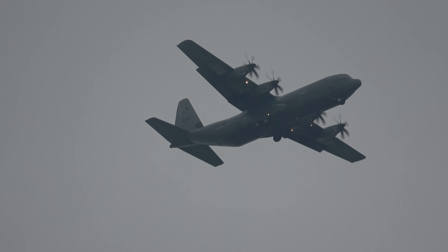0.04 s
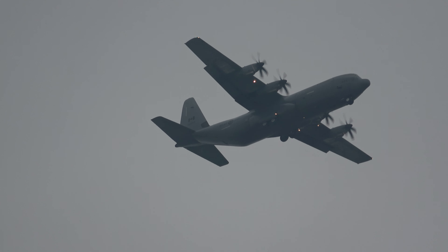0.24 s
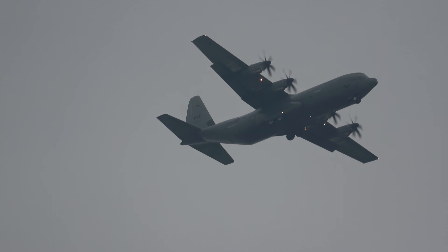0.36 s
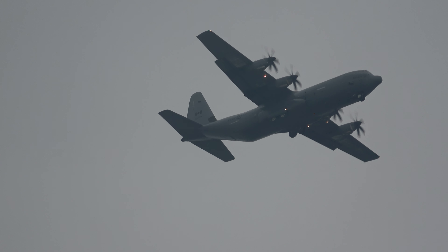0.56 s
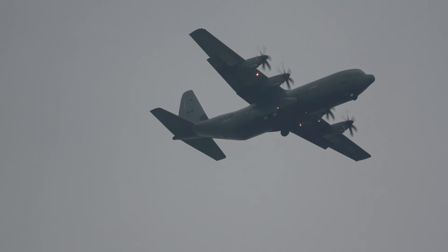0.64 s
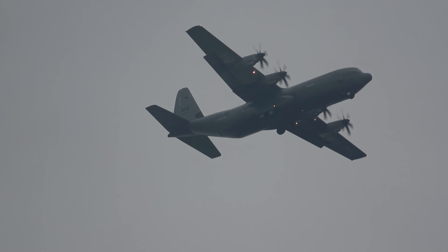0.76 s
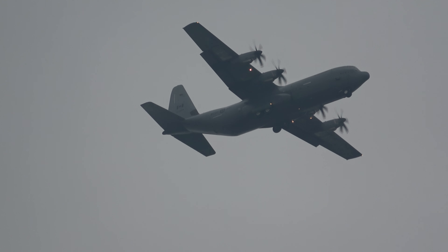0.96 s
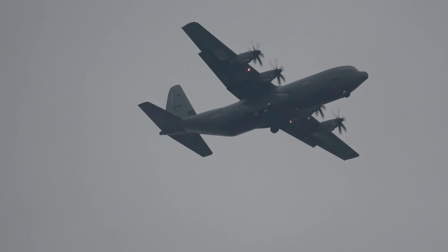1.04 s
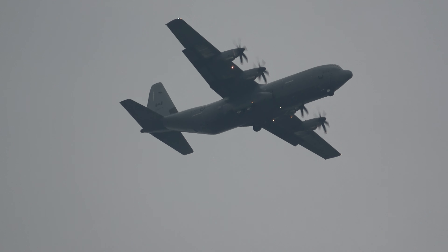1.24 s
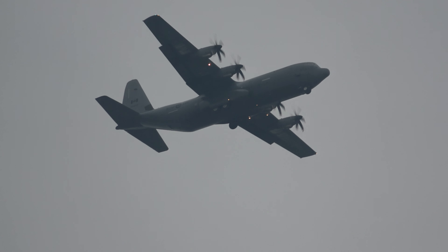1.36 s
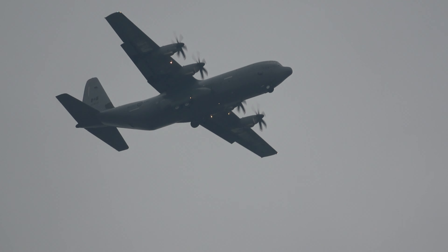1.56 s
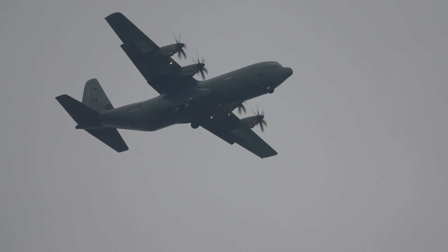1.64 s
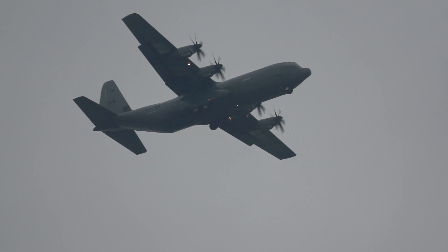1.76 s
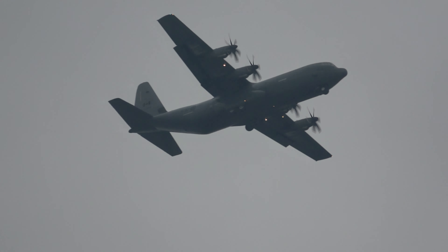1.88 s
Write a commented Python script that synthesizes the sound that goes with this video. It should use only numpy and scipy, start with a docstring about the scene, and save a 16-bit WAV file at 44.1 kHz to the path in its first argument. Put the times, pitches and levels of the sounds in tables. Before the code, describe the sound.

Heard from the ground in the open, a heavy propeller plane hums and roars continuously, slightly left in stereo. A very faint high whistle slides down midway, then soft close rustles tick over light hiss.

```python
"""Turboprop aircraft passing overhead

A turboprop is heard from the ground: its propellers hum on a low sinking note, a sine with weak overtones.
A turbine whine, tied to that note, is a tone partly scattered by slow random modulation.
The roar is filtered noise that swells and fades in the moving air, over a steady wide hiss.
Close by are faint rustles, bursts of bright noise, and a thin high whistle, a sliding sine, perhaps a bird.
"""
import sys
import numpy as np
from scipy.fft import dct
from scipy.io import wavfile

SR = 44100
rng = np.random.default_rng(int(sys.argv[2]) if len(sys.argv) > 2 else 0)


def generate_wav(signal):
    """Clip the signal to [-1, 1] and save it as 16-bit WAV at the path in sys.argv[1]."""
    frames = np.transpose(np.atleast_2d(signal))
    scaled = np.clip(frames, -1, 1) * 32767
    pcm = np.round(scaled).astype(np.int16)
    wavfile.write(sys.argv[1], SR, pcm)


N = 150381
TIME = np.arange(N) / SR                                   # s
BINS_HZ = np.maximum(np.arange(N) * SR / (2 * N), 1)       # cosine-transform frequencies

# steady background hiss: (f/Hz, density level/dB per Hz)
HISS_SPECTRUM = [(1000, -112), (4000, -109), (6200, -104.5), (9000, -108), (15500, -112.5)]
# correlation of the hiss between left and right: (f/Hz, correlation)
HISS_CORRELATION = [(4300, 1), (5800, 0.049), (10000, 0.083), (14500, 0.66)]

# sliding whistle: (t/s, f/Hz, level/dB)
WHISTLE_GLIDE = [(1.11, 8260, -93), (1.14, 8220, -78), (1.26, 8100, -76.5), (1.40, 8040, -85),
                 (1.43, 7900, -73), (1.6, 7790, -74), (1.68, 7700, -77), (1.98, 7700, -80),
                 (2.08, 7663, -110)]
WHISTLE_WAVER_HZ, WHISTLE_FLUTTER_DB = 55, 1.8             # rms deviations

# rustles: (onset t/s, level/dB, time from onset to decay/s)
RUSTLE_EVENTS = [(1.63, -61, .006), (1.816, -63, .003), (1.831, -67.5, 0.0044), (2.038, -62.5, 0.0054),
                 (2.124, -61, .009), (2.251, -59.5, 0.0043), (2.285, -67.5, .04), (2.333, -61, .02),
                 (2.531, -52.5, 0.019)]
# relative spectrum of the rustles: (f/Hz, density level/dB)
RUSTLE_SPECTRUM = [(2500, -7), (4600, -2.5), (5100, 4), (6800, 0), (7500, -12), (8200, -7), (9500, -23.5),
                   (15000, -29)]
RUSTLE_ATTACK_S, RUSTLE_RELEASE_S = 0.0037, 0.0045
RUSTLE_TAIL_DB, RUSTLE_TAIL_S = -8, 0.07                   # slower decay that lingers

# roar of propeller wash and exhaust, rippled by reflections: (f/Hz, density level/dB per Hz)
ROAR_SPECTRUM = [(20, -71), (36, -64), (55, -58.5), (80, -47), (135, -45.5), (175, -55.5), (225, -50),
                 (275, -48), (335, -53), (415, -51), (490, -61), (550, -54.5), (645, -62), (735, -54.5),
                 (880, -64), (1020, -59), (1160, -68), (1260, -63.5), (1430, -69), (1850, -70),
                 (2300, -77.5), (2850, -83.5), (3550, -99), (4300, -108), (5500, -120)]
# swell of the roar, used relative to its mean power: (t/s, lows level/dB, mids level/dB, treble level/dB)
ROAR_SWELL = [(0.0, -26.5, -33.5, -46.9), (0.5, -27, -31.0, -46.5), (0.75, -18.5, -26, -40.5),
              (1.1, -21.5, -27.5, -43.5), (1.45, -23.5, -30.5, -44.5), (1.75, -26.5, -30.5, -42.5),
              (2.0, -17.5, -26, -42.5), (2.2, -24.5, -31, -42), (2.45, -23, -31, -44.5),
              (2.57, -22, -30.5, -44.5), (2.85, -21.5, -29, -44.9), (3.05, -28, -28, -45.0),
              (3.3, -17.5, -28.5, -38.0), (3.41, -25.5, -23, -43)]
# centres of the lows, mids and treble: (f/Hz)
SWELL_CENTRES_HZ = [330, 950, 2400]
# power share of each range at the five centres, from the deepest upwards
RANGE_SHARES = [
    [1, .5, 0, 0, 0],    # rumble
    [0, .5, 1, 0, 0],    # lows
    [0, 0, 0, 1, 0],     # mids
    [0, 0, 0, 0, 1],     # treble
]
RUMBLE_TOP_HZ, RUMBLE_FOLLOWS = 178, 0.53                  # share of the hum's swing in dB
FLICKER_DB, FLICKER_HZ = 0.83, 24
ROAR_DIFFUSE_DB = -22.5

# turbine whine before the WHINE_DB offset: (t/s, level/dB)
WHINE_LEVEL = [(0.0, -36.5), (0.22, -33), (0.38, -43), (0.48, -29.5), (0.57, -36), (0.66, -29.5),
               (0.8, -29.5), (0.92, -36.5), (1.35, -38), (1.58, -32.5), (1.78, -41.5), (1.97, -36.5),
               (2.25, -44.5), (2.38, -31.5), (2.52, -42.5), (3.1, -38), (3.2, -30.5), (3.27, -35),
               (3.41, -42.2)]
WHINE_DB, WHINE_MULTIPLE = -2, 14.44                       # pitch as a multiple of the blade rate
WHINE_SCATTER, WHINE_SPREAD_HZ, WHINE_WANDER_HZ = 0.61, 30, 4

# blade-passing note, lowered by the Doppler shift: (t/s, f/Hz)
BLADE_PITCH = [(0, 118.1), (.8, 117.4), (1.35, 117), (2.0, 116.6), (2.6, 114.7), (3.41, 114.3)]
# propeller hum before the HUM_DB offset: (t/s, level/dB)
HUM_LEVEL = [(0.0, -33.5), (0.17, -20.5), (0.42, -20.5), (0.78, -15.5), (1.0, -20), (1.3, -20.3),
             (1.66, -14.5), (1.85, -16), (2.25, -12.5), (2.52, -12.0), (2.78, -19), (3.05, -11.5),
             (3.22, -11.5), (3.41, -11.5)]
HUM_DB, HUM_FLUTTER_DB, HUM_FLUTTER_HZ = -3, 0.16, 16
# overtones of the blade note: (multiple of the blade rate, level/dB)
BLADE_OVERTONES = [(2, -37.5), (3, -41.5), (9, -45.5)]
OVERTONE_FADE_DB, OVERTONE_WANDER_HZ = 3, 9                # rms deviations

# direction of the aircraft: (f/Hz, left minus right level/dB)
EAR_BALANCE = [(80, 0.7), (150, 0.2), (240, 5.5), (470, 6), (620, 4), (1100, 3), (1450, 1.5), (1700, 2.5),
               (2100, 1)]
CUTOFF_HZ = 15600


def from_db(db):
    """A level in decibels is twenty times the logarithm of the amplitude gain."""
    return 10 ** (np.asarray(db) / 20)


def rms_one(x):
    """Division by the root mean square normalises a signal to unit power."""
    return x / np.sqrt(np.mean(x ** 2) + 1e-20)


def in_time(rows):
    """Linear interpolation gives each column of a time table at every sample."""
    t, *columns = np.transpose(rows)
    return [np.interp(TIME, t, column) for column in columns]


def at_hz(points):
    """Interpolation over log frequency gives a spectrum table at every bin."""
    hz, value = np.transpose(points)
    return np.interp(np.log(BINS_HZ), np.log(hz), value)


def shaped(x, gain):
    """A linear filter multiplies each frequency component by its own gain."""
    spectrum = dct(x, norm="ortho")
    return dct(spectrum * gain, type=3, norm="ortho")


def noise(density):
    """White noise is filtered to a given amplitude density per root hertz."""
    return shaped(rng.standard_normal(N), density * np.sqrt(SR / 2))


def drift(rate_hz):
    """Low-passed noise, 6 dB down at rate_hz, is a slow random motion of unit rms."""
    return rms_one(noise((BINS_HZ > 1) / (1 + (BINS_HZ / rate_hz) ** 2)))


def phase_of(hz):
    """Phase is the running integral of angular frequency."""
    return 2 * np.pi * np.cumsum(hz) / SR


def swing(db):
    """A fluctuating level is referred to its own mean power."""
    return db - 10 * np.log10(np.mean(from_db(db) ** 2))


def hiss():
    """Common and opposite-phase noise set the interaural correlation of a steady hiss."""
    density = from_db(at_hz(HISS_SPECTRUM))
    correlation = np.clip(at_hz(HISS_CORRELATION), -1, 1)
    common = noise(density * np.sqrt((1 + correlation) / 2))
    opposite = noise(density * np.sqrt((1 - correlation) / 2))
    return common + opposite * [[1], [-1]]


def whistle():
    """Random frequency and amplitude modulation make a faint downward glide waver."""
    hz, level_db = in_time(WHISTLE_GLIDE)
    phase = phase_of(hz + WHISTLE_WAVER_HZ * drift(90))
    amplitude = np.sqrt(2) * from_db(level_db + WHISTLE_FLUTTER_DB * drift(20))
    return amplitude * np.sin(phase)


def rustles():
    """Bursts of bright noise, independent at each ear, decay in a fast and a slow exponential."""
    envelope = 0
    for onset, level_db, length in RUSTLE_EVENTS:
        rise = np.clip((TIME - onset) / RUSTLE_ATTACK_S, 0, 1)
        after = np.maximum(TIME - onset - length, 0)
        release = np.exp(-after / RUSTLE_RELEASE_S)
        tail = from_db(RUSTLE_TAIL_DB) * np.exp(-after / RUSTLE_TAIL_S)
        envelope = envelope + from_db(level_db) * rise * np.maximum(release, tail)
    density = from_db(at_hz(RUSTLE_SPECTRUM))
    return envelope * np.array([rms_one(noise(density)) for _ in range(2)])


def roar():
    """Turbulence radiates broadband noise, its four overlapping ranges fluctuating separately."""
    lows, mids, treble = map(swing, in_time(ROAR_SWELL))
    rumble = RUMBLE_FOLLOWS * swing(in_time(HUM_LEVEL)[0])
    centres = [RUMBLE_TOP_HZ / 2, RUMBLE_TOP_HZ] + SWELL_CENTRES_HZ
    density = from_db(at_hz(ROAR_SPECTRUM))
    out = 0
    for shares, swell_db in zip(RANGE_SHARES, (rumble, lows, mids, treble)):
        power_share = at_hz(list(zip(centres, shares)))
        band = noise(density * np.sqrt(power_share))
        out = out + band * from_db(swell_db + FLICKER_DB * drift(FLICKER_HZ))
    return out


def turbine(blade_hz):
    """Scattering by turbulent air broadens a tone geared to the propellers into a narrow band."""
    level_db, = in_time(WHINE_LEVEL)
    phase = phase_of(WHINE_MULTIPLE * blade_hz + WHINE_WANDER_HZ * drift(5))
    scattered = drift(WHINE_SPREAD_HZ) * np.sin(phase) + drift(WHINE_SPREAD_HZ) * np.cos(phase)
    whine = rms_one(np.sin(phase) + WHINE_SCATTER * scattered)
    return from_db(level_db + WHINE_DB) * whine


def propellers(blade_hz):
    """Periodic blade passage gives a nearly pure fundamental with weak, wavering overtones."""
    level_db, = in_time(HUM_LEVEL)
    flutter_db = HUM_FLUTTER_DB * drift(HUM_FLUTTER_HZ)
    tone = np.sin(phase_of(blade_hz)) * from_db(level_db + HUM_DB + flutter_db)
    for multiple, overtone_db in BLADE_OVERTONES:
        hz = round(multiple) * blade_hz + OVERTONE_WANDER_HZ * drift(5.8)
        amplitude = from_db(overtone_db + OVERTONE_FADE_DB * drift(3.1))
        tone = tone + amplitude * np.sin(phase_of(hz))
    return np.sqrt(2) * tone


def aircraft():
    """Interaural level difference places the source a little left, amid a diffuse opposite-phase roar."""
    blade_hz, = in_time(BLADE_PITCH)
    direct = propellers(blade_hz) + turbine(blade_hz) + roar()
    lean = from_db(at_hz(EAR_BALANCE))
    left = shaped(direct, 2 * lean / (1 + lean))
    right = shaped(direct, 2 / (1 + lean))
    diffuse = from_db(ROAR_DIFFUSE_DB) * roar()
    return np.array([left, right]) + diffuse * [[1], [-1]]


def scene():
    """By superposition the pressures of background, nearby sounds and aircraft add."""
    return hiss() + whistle() + rustles() + aircraft()


def record(dry):
    """A very steep low-pass filter removes the components above its cutoff."""
    return shaped(dry, 1 / np.sqrt(1 + (BINS_HZ / CUTOFF_HZ) ** 200))


dry = scene()
out = record(dry)
generate_wav(out)
```